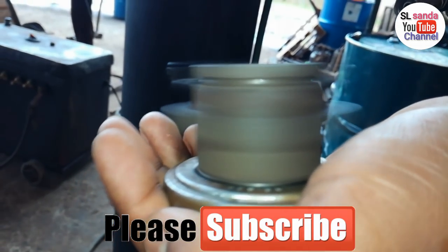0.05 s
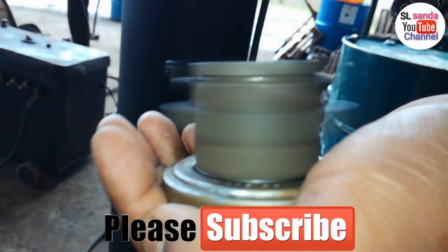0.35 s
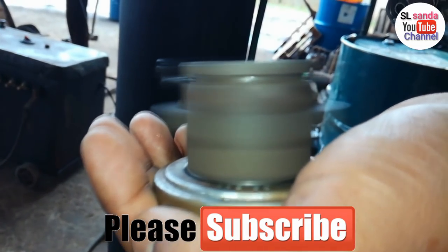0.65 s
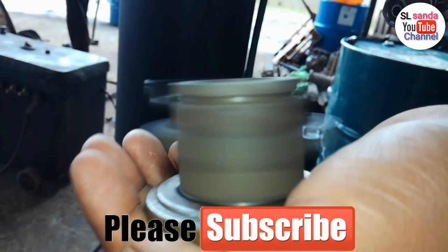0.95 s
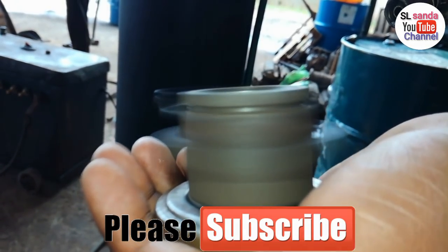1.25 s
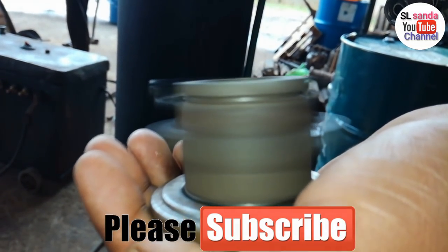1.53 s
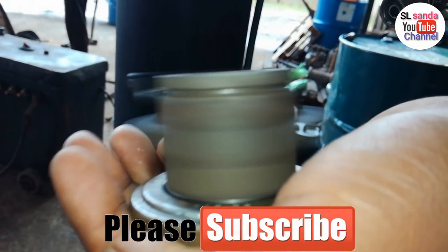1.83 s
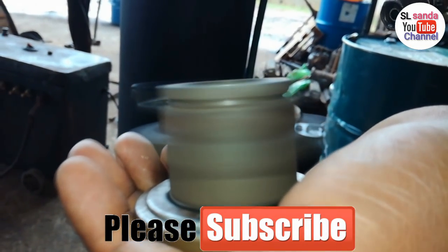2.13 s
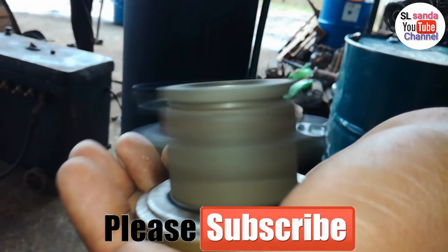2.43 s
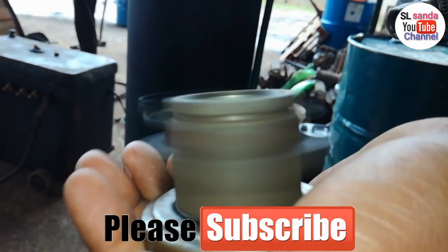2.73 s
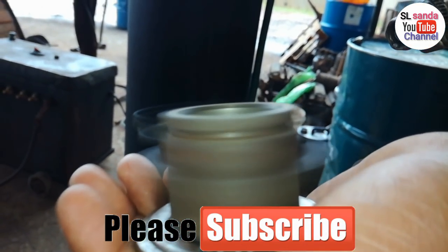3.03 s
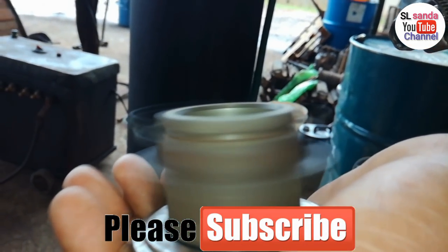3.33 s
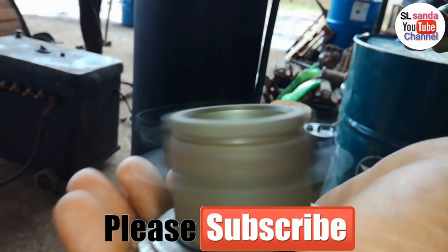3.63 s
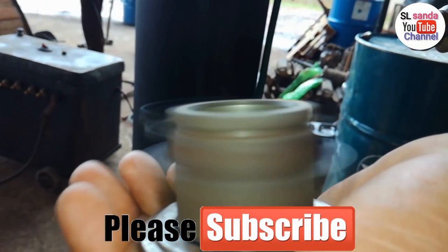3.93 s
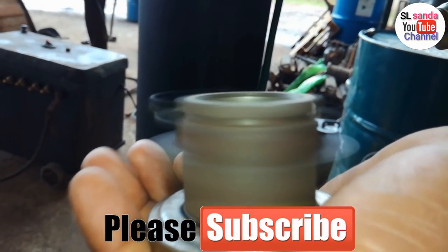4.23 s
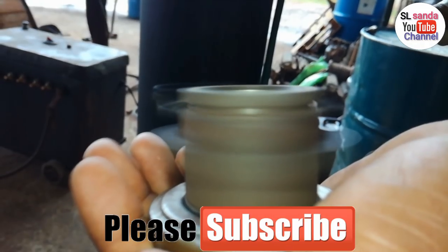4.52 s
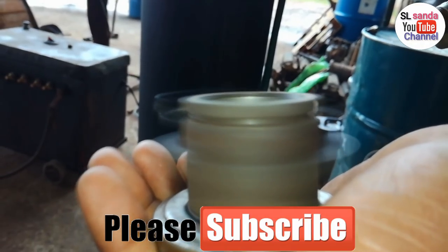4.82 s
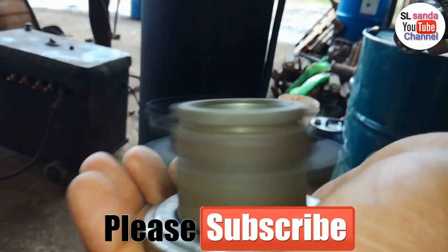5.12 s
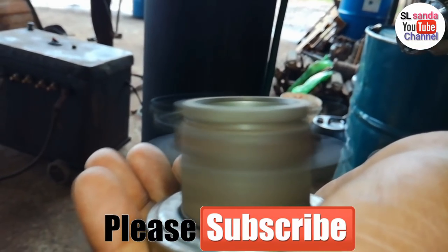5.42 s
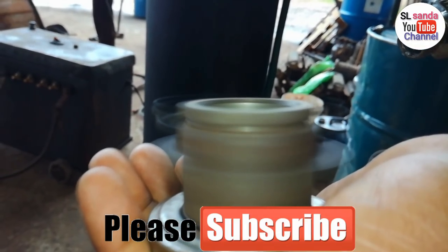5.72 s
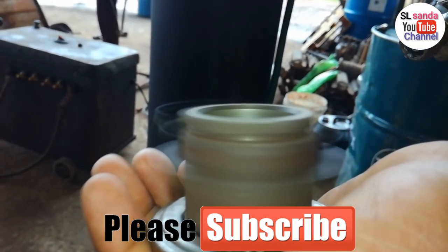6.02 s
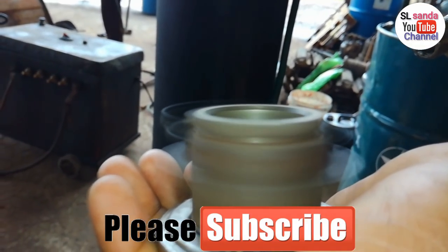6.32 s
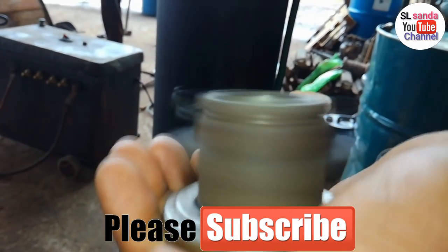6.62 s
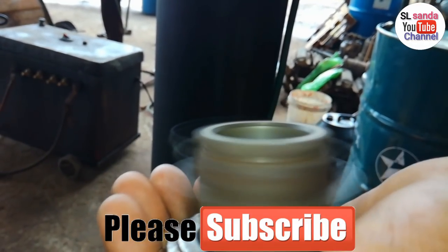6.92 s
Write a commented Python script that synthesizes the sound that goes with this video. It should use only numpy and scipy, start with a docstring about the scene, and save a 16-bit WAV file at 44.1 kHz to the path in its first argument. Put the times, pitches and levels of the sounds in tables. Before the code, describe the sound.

Loud hissing air tears across a metal bearing and spins it up, very close to the microphone in a workshop. A hollow, breathy tone, faint high whistling and a low hum sit inside the rush, with air buffeting the slightly distorted microphone. The blast falls away shortly before the end; the bearing coasts under the nozzle's light hiss as the hand shifts with soft, low thumps.

```python
"""A loud rush and spray of air comes first: a compressed-air jet tearing on the rim of a steel bearing,
spinning it up with its hub on an open hand, close to the microphone. The jet hoots across the hollow hub,
is chopped a little at every turn, whistles on the rim's edge and buffets the overloaded microphone.
Near the end it slips off; the hub coasts under the nozzle's thin hiss and the hand shifts softly."""
import sys
import numpy as np
from scipy import signal
from scipy.io import wavfile
from scipy.ndimage import uniform_filter1d

SR = 44100
rng = np.random.default_rng(int(sys.argv[2]) if len(sys.argv) > 2 else 0)


def transcribe(signal):
    """Save signal, clipped to [-1, 1], as a 16-bit WAV file at the path in sys.argv[1]."""
    frames = np.atleast_2d(signal).T
    limited = np.clip(frames, -1, 1)
    pcm = np.round(limited * 32767).astype(np.int16)
    wavfile.write(sys.argv[1], SR, pcm)


N = 311346
FRAME, HOP = 1024, 256
HZ = np.fft.rfftfreq(FRAME, 1 / SR)
TIMES = np.arange(N // HOP + 5) * HOP / SR
SLIP_S = 6.43  # the jet starts to slide off the hub


def gain_of(db):
    """Decibels to amplitude."""
    return 10 ** (np.asarray(db) / 20)


def over_hz(table):
    """Each column of a spectrum table, read on a log-frequency axis."""
    hz, *columns = np.transpose(table)
    return np.array([np.interp(np.log(HZ + 1), np.log(hz + 1), column) for column in columns])


def eddies(frames, bins):
    """Smooth random patches of unit spread over time and frequency."""
    field = rng.standard_normal((len(TIMES), len(HZ)))
    field = uniform_filter1d(field, frames, axis=0)
    field = uniform_filter1d(field, bins, axis=1)
    return field / field.std()


def resonance_db(centre_hz, width_hz):
    """A steep-sided resonance, in dB over frequency."""
    return -20 * np.log10(1 + (2 * (HZ - centre_hz) / width_hz) ** 2)


def slip_db(lag_s, fall_db_per_s):
    """A sound holds until lag_s after the jet starts to slide off, then falls steadily."""
    return -fall_db_per_s * np.maximum(TIMES[:, None] - SLIP_S - lag_s, 0)


def spin_up(t, start_s=0.85, takes_s=5.9):
    """The hub gathers speed along an S-curve, from 0 (slow) to 1 (fast)."""
    return np.sin(np.pi / 2 * np.clip((t - start_s) / takes_s, 0, 1)) ** 2


# How alike the air sounds at the left and right microphones, in the deepest bass and above it.
# Each row: frequency in Hz, coherence from 0 to 1, phase lead of the left in radians.
BASS_LIKENESS = [(55, .98, 0)]
SIDE_LIKENESS = [(170, 0.56, 0), (247, 0.1, 1), (278, 0.42, 1), (401, 0.58, 3.5), (567, 0.76, 3),
                 (750, 0.41, 3), (945, 0.3, 1.5), (1100, 0.63, 0.46), (1646, 0.74, 1.5), (2150, 0.43, 3),
                 (2900, 0.17, 2.5), (3420, 0.43, 6.5), (4210, 0.94, 10.5), (4860, 0, 11.5),
                 (7250, 0.31, 13.5), (9200, 0.12, 17.5)]

def air_noise(density_db):
    """Air noise at the two microphones, its dB per Hz following a field over time and frequency."""
    a, b, c, d = rng.standard_normal((4, len(TIMES), len(HZ)))
    coherence, lead = over_hz(np.vstack([BASS_LIKENESS, SIDE_LIKENESS]))
    left, unrelated = a + 1j * b, c + 1j * d
    right = coherence * left * np.exp(-1j * lead) + np.sqrt(1 - coherence ** 2) * unrelated
    bin_width_hz = 1.5 * SR / FRAME
    spectra = np.sqrt(bin_width_hz) * gain_of(density_db) * np.array([left, right])
    return signal.istft(spectra.swapaxes(1, 2), nperseg=FRAME, noverlap=FRAME - HOP)[1][:, :N]


# Where the jet points. Each row: time in seconds, aim from 0 (across the hub's mouth) to 1 (on the rim).
JET_AIM = [(0.15, 0.14), (0.6, 0.5), (1.12, .02), (2.0, 0.75), (2.7, 0.45), (3.9, 1), (6.3, 0.77)]

def aim():
    """How squarely the jet meets the rim, one value a frame."""
    return np.interp(TIMES, *np.transpose(JET_AIM))[:, None]


# The rush, close to the rim. Each row: frequency in Hz, left and right base levels in dB per Hz.
RUSH_SPECTRUM = [(121, -55, -57), (306, -50.5, -50), (605, -51.5, -50.5), (890, -49.5, -51),
                 (1900, -49.5, -49.5), (2300, -47.5, -51.5), (2900, -48, -50.5), (3320, -46.5, -52),
                 (3970, -45, -49), (5070, -62, -72)]

def rush_db(off_rim_db=-2.0, aim_db=2.5):
    """Large eddies shed by the rim grow as the jet comes square on it, and go first when it slips."""
    level_db = off_rim_db + aim_db * aim() + slip_db(lag_s=0.028, fall_db_per_s=140)
    return over_hz(RUSH_SPECTRUM)[:, None] + level_db


# The spray, close to the steel. Each row: frequency in Hz, left and right base levels in dB per Hz.
SPRAY_SPECTRUM = [(3100, -73, -73.5), (4660, -51.5, -47.5), (5010, -46, -48.5), (5670, -43, -49),
                  (6170, -45, -56), (7000, -47, -49.5), (8000, -50, -50.5), (8580, -55, -55.5),
                  (9820, -53, -49), (11240, -50, -60.5), (12000, -63, -50), (13300, -52.5, -59),
                  (14000, -53, -57.5)]

def spray_db(slow_db=-0.74, speed_db=1.06, bright_db_per_octave=0.8, dulling_db_per_octave=2.4):
    """Fine eddies where the jet splits get louder and duller with speed; the finest outlast the slip."""
    speed = spin_up(TIMES)[:, None]
    octaves = np.log2(np.maximum(HZ / 6000, 1))  # above 6 kHz
    colour_db = (bright_db_per_octave - dulling_db_per_octave * speed) * octaves
    fade_db = slip_db(lag_s=0.05 + 0.15 * np.minimum(octaves, 1), fall_db_per_s=66)
    return over_hz(SPRAY_SPECTRUM)[:, None] + slow_db + speed_db * speed + colour_db + fade_db


# How much the treble flickers. Each row: frequency in Hz, spread in dB.
TREBLE_FLICKER = [(300, .5), (1500, 0.6), (2300, 2.5), (3900, 2), (4800, 1.5), (7400, 0.5), (8600, 3),
                  (10000, 2), (14000, 3.5)]

def treble_flicker_db(fine_share=1.24):
    """A grainy shimmer in the treble, mostly the sound of audio compression."""
    broad, fine = eddies(frames=5, bins=56), eddies(frames=12, bins=4)
    return over_hz(TREBLE_FLICKER) * (broad + fine_share * fine) / np.hypot(1, fine_share)


def rim(shiver_db=0.4, wander_db=0.3):
    """The jet breaks on the rim; the nozzle wanders, so the colour keeps shifting."""
    shiver = shiver_db * eddies(frames=3, bins=500)  # the whole jet trembles at once
    wander = wander_db * eddies(frames=90, bins=10)
    jet_db = 20 * np.log10(np.hypot(gain_of(rush_db()), gain_of(spray_db())))
    return air_noise(jet_db + shiver + wander + treble_flicker_db())


def hub_hoot(base_db=-41.0, aim_db=-8, open_hz=1435, aim_sag_hz=105, width_hz=440, flutter_db=1.2):
    """Turbulence rings the hub's cavity: a breathy hoot that weakens and sinks as the jet nears the rim."""
    side_pitch = np.array([0.94, 1.05])[:, None, None]  # deeper at the left microphone
    side_db = np.array([0, 0.9])[:, None, None]
    level_db = base_db + side_db + aim_db * aim() + slip_db(lag_s=0.057, fall_db_per_s=231)
    centre_hz = (open_hz - aim_sag_hz * aim()) * side_pitch
    flutter = flutter_db * eddies(frames=4, bins=10)
    return air_noise(level_db + resonance_db(centre_hz, width_hz) + flutter)


# The nozzle blowing into free air nearby. Each row: frequency in Hz, left and right levels in dB per Hz.
NOZZLE_SPECTRUM = [(60, -66, -64), (600, -70, -68), (1400, -68.5, -62.5), (2640, -67, -64),
                   (3360, -61.5, -61), (4000, -73, -73), (4860, -55, -54.5), (5830, -54.5, -55.5),
                   (7140, -59, -60.5), (8100, -66, -59), (9900, -57, -58), (12000, -63.5, -62.5),
                   (12800, -64, -51), (15000, -63, -57)]

def nozzle(flutter_db=2.0):
    """The steady hiss of the free jet."""
    return air_noise(over_hz(NOZZLE_SPECTRUM)[:, None] + flutter_db * eddies(frames=7, bins=12))


# Wind right on the microphone. Each row: frequency in Hz, base level in dB per Hz.
DRAUGHT_SPECTRUM = [(15, -73), (45, -54), (90, -50.5), (150, -49.5), (250, -53), (400, -59), (900, -82)]
# Gusts that catch the microphone. Each row: middle in seconds, half length in seconds, rise in dB.
DRAUGHT_GUSTS = [(0.854, .22, 3), (5.35, .15, 1)]

def draught(level_db=1.6, flutter_db=0.94, coasting_db=-25, sway_db=3.0):
    """Air thrown off the hub rumbles on the microphone; a weak, uneven stir remains while it coasts."""
    gust_db = sum(db * np.exp(-((TIMES[:, None] - middle_s) / half_s) ** 2)
                  for middle_s, half_s, db in DRAUGHT_GUSTS)
    stir_db = coasting_db + sway_db * eddies(frames=10, bins=200)
    blown_db = level_db + gust_db + np.maximum(slip_db(lag_s=0.055, fall_db_per_s=130), stir_db)
    flutter = flutter_db * eddies(frames=6, bins=12)
    return air_noise(over_hz(DRAUGHT_SPECTRUM)[:, None] + blown_db + flutter)


def spinning(slow_hz=73.4, fast_hz=97, coast_hz_per_s=4.4, chop_depth=0.06):
    """The lopsided hub hums once and twice a turn; returns that hum and the gain that chops the jet."""
    t = np.arange(N) / SR
    speed, coasted_s = spin_up(t), np.maximum(t - SLIP_S, 0)
    turns_hz = slow_hz + (fast_hz - slow_hz) * speed - coast_hz_per_s * coasted_s
    angle = 2 * np.pi * (np.cumsum(turns_hz) / SR + rng.random())
    once_db = -50 + 15 * speed - 45 * coasted_s  # the lower note takes over with speed, and dies sooner
    twice_db = -39 - 5 * speed - 11 * coasted_s
    hum = np.sqrt(2) * (gain_of(once_db) * np.sin(angle) + gain_of(twice_db) * np.sin(2 * angle))
    chop = 1 + chop_depth * (np.cos(angle) + 0.51 * np.cos(2 * angle))
    return hum, chop


# Thin, breathy whistles to the right of the microphone.
# Each row: start in seconds, length in seconds, pitch in Hz, level on the right in dB per Hz.
EDGE_WHISTLES = [(0.7, 2.2, 12200, -52), (3.2, 1.1, 14400, -54), (4.8, 1.9, 14850, -49)]

def edge_whistles(width_hz=900, left_db=-7, flutter_db=3.0, ramp_s=0.3):
    """The sharp rim splits the jet; each whistle swells, holds and fades."""
    t, power = TIMES[:, None], 1e-14
    for start_s, length_s, hz, db in EDGE_WHISTLES:
        swell = np.clip(np.minimum(t - start_s, start_s + length_s - t) / ramp_s, 0, 1)
        power = power + swell * gain_of(db + resonance_db(hz, width_hz)) ** 2
    side_db = np.array([left_db, 0])[:, None, None]
    return air_noise(10 * np.log10(power) + side_db + flutter_db * eddies(frames=6, bins=20))


# Soft bumps of the hand, close and central.
# Each row: start in seconds, level before damping in dB, pitch in Hz.
HAND_BUMPS = [(6.712, -19, 70), (6.797, -31, 90), (6.898, -20, 60)]

def hand_bumps(decay_s=0.0055):
    """Each shift of the hand gives one heavily damped low push."""
    out = np.zeros(N)
    for start_s, db, hz in HAND_BUMPS:
        t = np.maximum(np.arange(N) / SR - start_s, 0)
        out += gain_of(db) * np.sin(2 * np.pi * hz * t) * np.exp(-t / decay_s)
    return out


def scene():
    """The jet on the metal throbs with the rotation; nozzle, draught, hum and hand lie around it."""
    hum, chop = spinning()
    jet_on_metal = rim() + edge_whistles() + hub_hoot()
    return chop * jet_on_metal + nozzle() + draught() + hum + hand_bumps()


def overload(x, headroom, bias):
    """A microphone driven hard flattens sooner on one side of the wave; the offset is blocked."""
    bent = headroom * (np.tanh(x / headroom - bias) + np.tanh(bias)) / (1 - np.tanh(bias) ** 2)
    return bent - uniform_filter1d(bent, size=4001)


def record(dry, left_db=0.5, right_db=-0.5, cutoff_hz=15500):
    """A close pair of microphones, the left overloading more than the right; then the band limit."""
    left = gain_of(left_db) * overload(dry[0], headroom=1.13, bias=0.15)
    right = gain_of(right_db) * overload(dry[1], headroom=2.2, bias=0.071)
    lowpass = signal.firwin(511, cutoff_hz, window=("kaiser", 8), fs=SR)
    return signal.oaconvolve(np.array([left, right]), lowpass[None], "same", axes=1)


dry = scene()
out = record(dry)
transcribe(out)
```